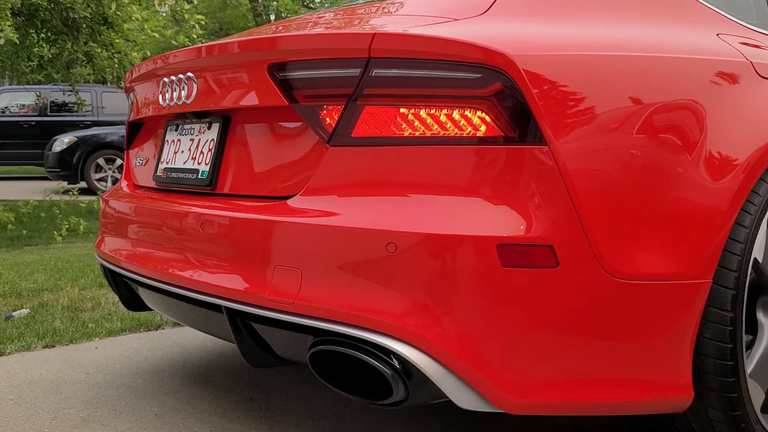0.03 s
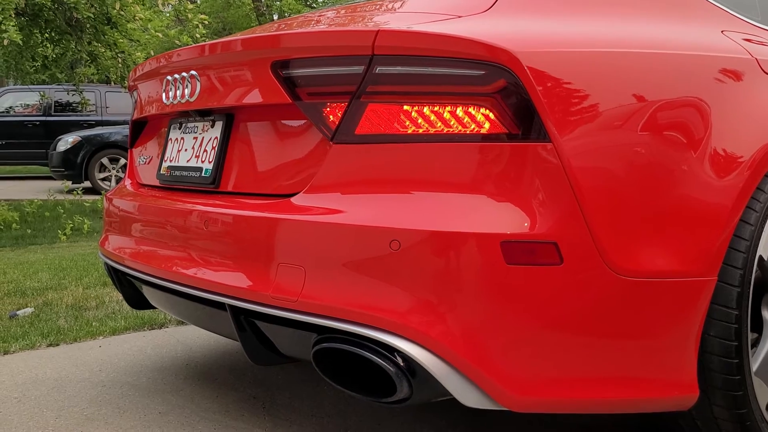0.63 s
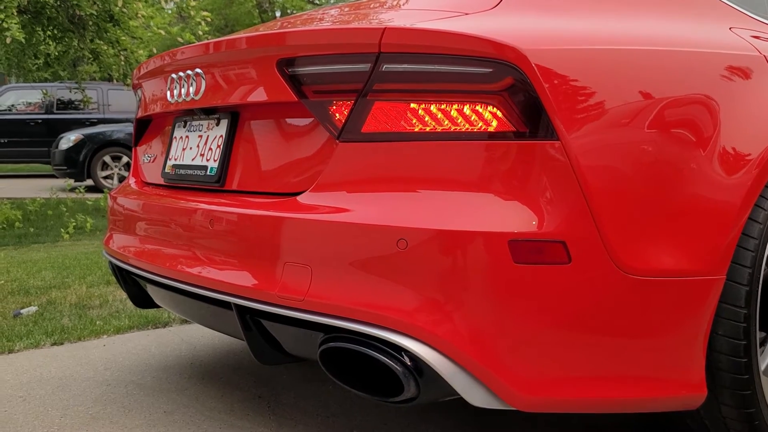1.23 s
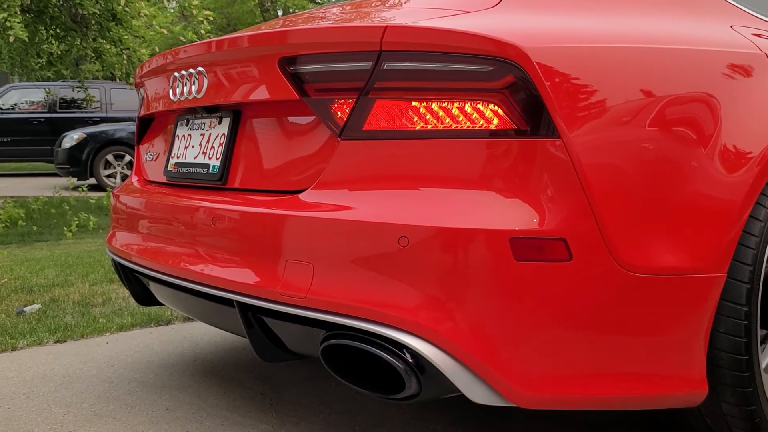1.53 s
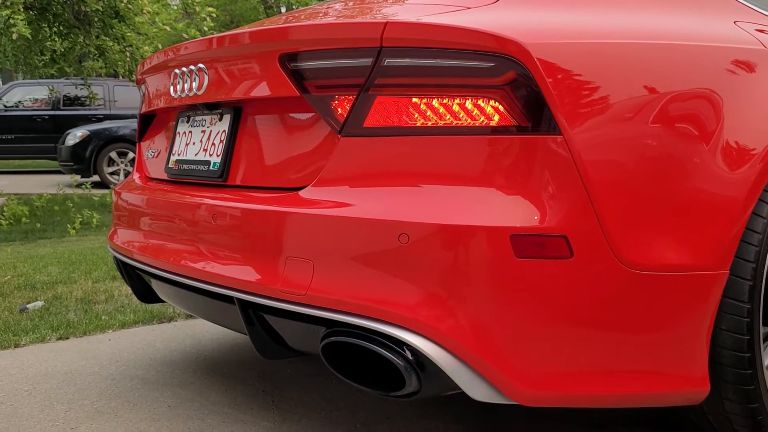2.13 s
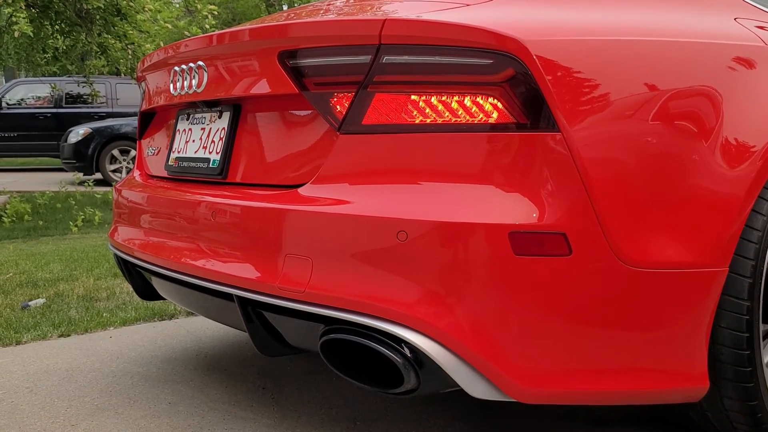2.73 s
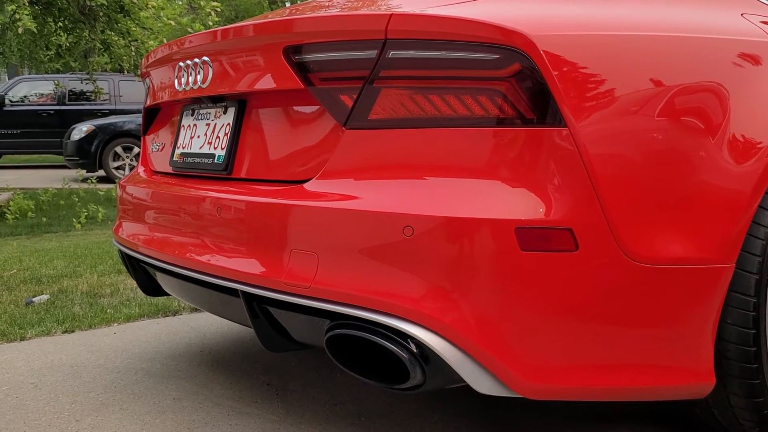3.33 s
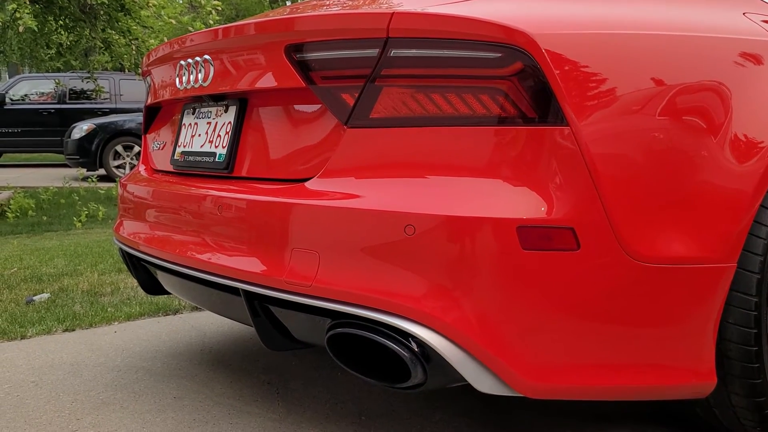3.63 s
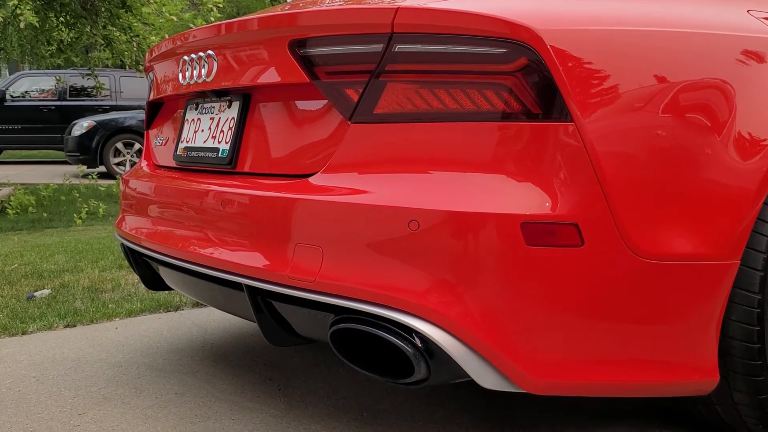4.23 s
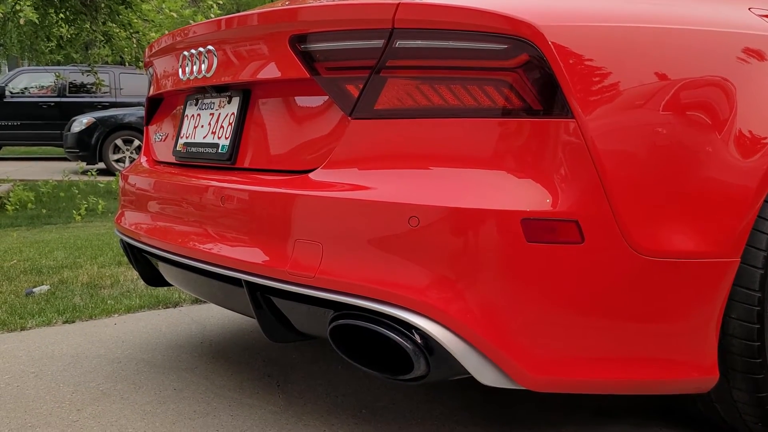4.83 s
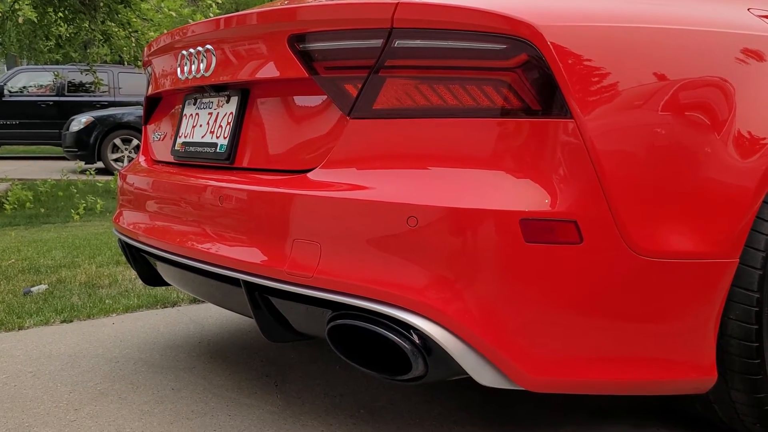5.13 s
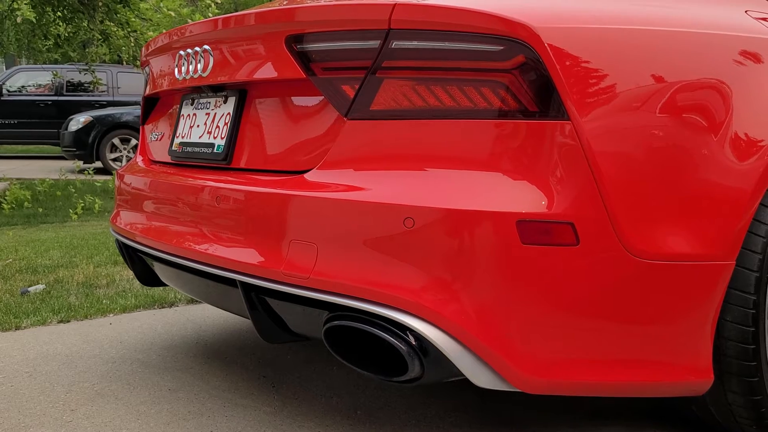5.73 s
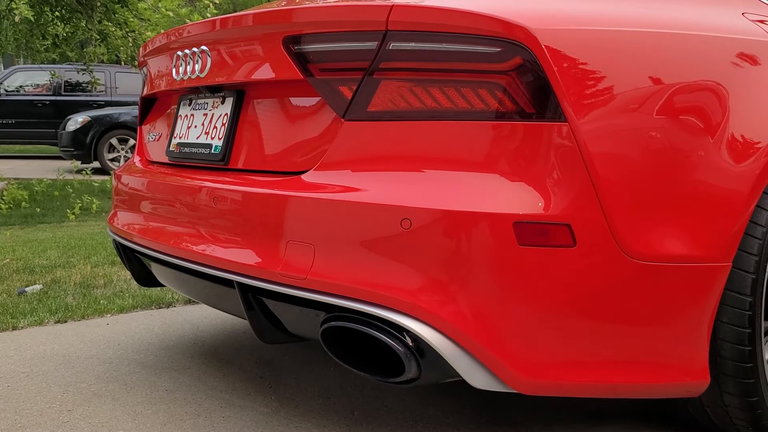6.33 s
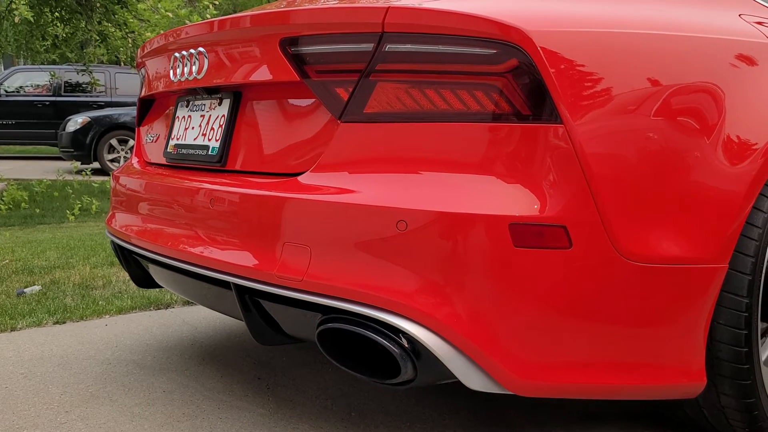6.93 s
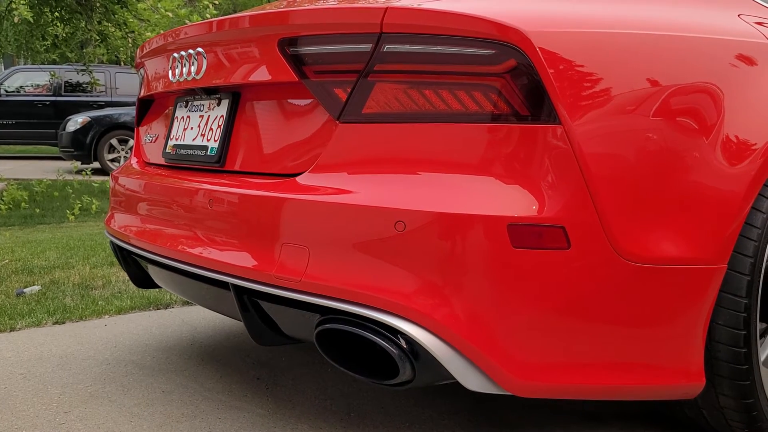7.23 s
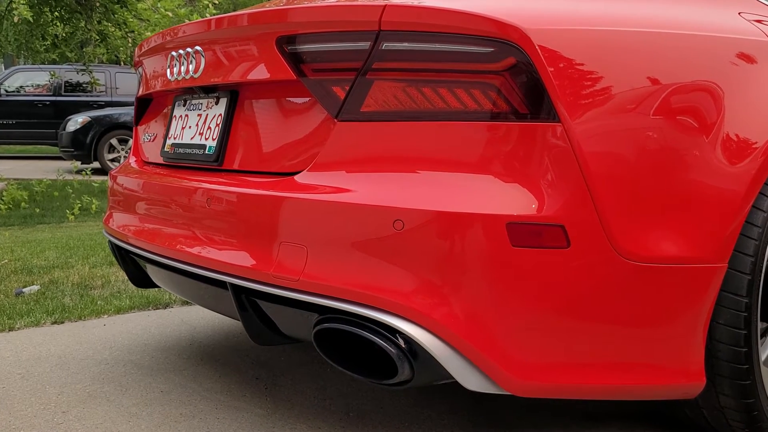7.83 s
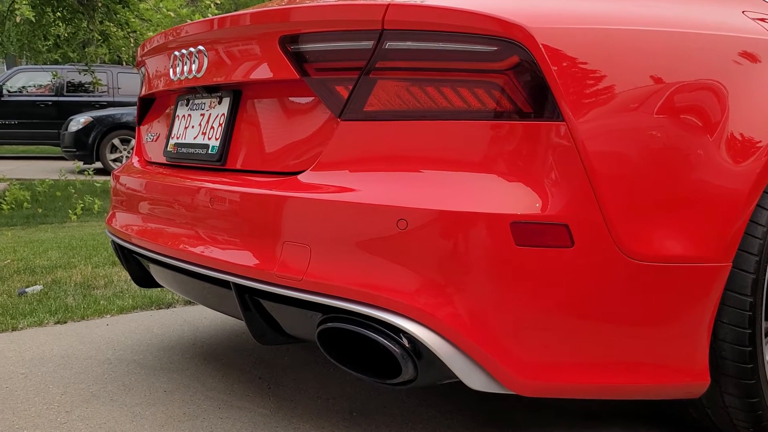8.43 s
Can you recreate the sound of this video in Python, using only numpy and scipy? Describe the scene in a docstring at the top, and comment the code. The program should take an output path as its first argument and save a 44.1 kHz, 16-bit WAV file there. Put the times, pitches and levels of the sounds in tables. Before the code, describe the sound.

Close to the tailpipe, a V8 car cold starts with a short grinding crank, a loud flare and a booming, raspy fast idle.

```python
"""A clunk and a grinding starter over faint outdoor air, then a cold V8 catches, flares and falls
to a fast idle. The car stands on a driveway, a stereo pair of microphones just behind its tailpipe.
The starter pinion slams into the ring gear and turns the engine over, each compression a thump.
Each firing sends a boom, a ringing pulse and a rasping burst of gas down the pipe;
the ground and the car's body reflect them."""
import sys
import numpy as np
from scipy import signal
from scipy.fft import rfft, irfft, next_fast_len
from scipy.io import wavfile

SR = 44100
rng = np.random.default_rng(int(sys.argv[2]) if len(sys.argv) > 2 else 0)


def wav_record(signal):
    """Record a signal, one row per channel, as 16-bit PCM in the file named by sys.argv[1]."""
    frames = np.transpose(np.atleast_2d(signal))
    bounded = np.clip(frames, -1, 1)
    # unit amplitude maps onto the largest positive 16-bit level
    quanta = np.round(bounded * 32767).astype(np.int16)
    wavfile.write(sys.argv[1], SR, quanta)


N = 374850
TIME = np.arange(N) / SR
STARTER_ON_S, FIRST_FIRING_S, STARTER_OFF_S = 1.225, 1.95, 1.97

# standing waves of the exhaust pipe (f/Hz, width/Hz, relative level/dB)
PIPE_MODES = [(435.2, 14, 6), (548.5, 36, -9), (678, 45, -6.5), (802.4, 44, 6.5), (902, 117, -3.),
              (1113, 77, -5.5)]
# resonances of its metal tip (f/Hz, width/Hz, relative level/dB)
TIP_MODES = [(1640, 52, -10.5), (1902, 12.5, -1), (2172, 148, -3), (2478, 65, 3.5), (2734, 9.2, -1.5),
             (2982, 80, -3.5), (3051, 96, -3), (3270, 12.7, -0.5)]
# spectrum of gas hissing out of the tip (f/Hz, relative level/dB)
HISS_SPECTRUM = [(500, -25), (1300, -8), (1650, 1), (3000, 1), (3700, -2.5), (4300, 2), (5000, -1.5),
                 (6300, -4), (7400, -4), (8800, -12), (12000, -12.5), (13500, -16), (16000, -19.5)]
# thumps of the compression strokes while cranking (t/s, level/dB)
STROKES = [(1.29, -36), (1.42, -21.5), (1.532, -17.5), (1.624, -26.5), (1.714, -32), (1.8, -43),
           (1.877, -27.5)]


def engine():
    """The V8 at the tailpipe, close up: boom, burble, ring and rasp follow one crankshaft."""
    # engine speed through catch, flare and fast idle (t/s, firing rate/Hz)
    speed = [(1.95, 45.56), (1.985, 39.41), (2.03, 63.0), (2.08, 84.24), (2.2, 108.88), (2.32, 117.62),
             (2.5, 107.35), (2.75, 100.82), (3.1, 85.28), (3.6, 87.16), (4.25, 93.03), (4.85, 89.66),
             (5.6, 88.94), (6.15, 87.3), (7.55, 87.64), (8.5, 86.28)]
    # effort against the settled idle (t/s, load/dB, gas flow/dB)
    effort = [(1.95, -5, -6.0), (2.0, 5.5, 5), (2.12, 12, 3.5), (2.38, 9, 0.5), (2.65, 1.5, -3),
              (2.88, 10, -1.5), (3.13, -4, -2.0), (3.6, 2, 0), (4.0, 6.0, 1.5), (4.3, 7.0, 0.0),
              (4.8, 3, -1), (5.6, 3.5, 0.0), (6.3, -0.5, 0), (8.5, -2, -1)]
    firing_hz, = in_time(speed)
    load_db, flow_db = in_time(effort)
    phase = np.cumsum(firing_hz) / SR   # counted in firings
    phase -= np.interp(FIRST_FIRING_S, TIME, phase)
    low = from_the_right(boom(phase, firing_hz, load_db) + burble(phase, flow_db, load_db))
    high = pipe_ring(phase, firing_hz, load_db) + rasp(phase, flow_db)
    return fade_in(1.925, 0.052) * low + fade_in(1.945, 0.013) * high + spits()


def boom(phase, firing_hz, load_db):
    """The muffler leaves a nearly pure firing tone; load brings out its overtones."""
    # loudness of the firing tone (t/s, relative level/dB)
    tone_levels = [(1.94, -24), (1.97, -14.5), (2.03, -5.5), (2.51, -17.5), (2.91, -12.5), (3.5, -10.5),
                   (4.84, -13), (5.84, -11), (8.36, -11.5), (8.4, -11.5)]
    # firings that fail (t/s, share lost/0-1, half width/s)
    misfires = [(2.072, 0.97, 0.0074), (2.501, 1, 0.0079)]
    # what the muffler lets through of the overtones (f/Hz, relative level/dB)
    muffler = [(80, 23), (125, 13.5), (150, -3.5), (180, 3), (205, -1), (235, 0), (280, -4), (330, -4),
               (400, -14), (470, -15)]
    tone = from_db(in_time(tone_levels)[0] - 0.27) * np.cos(2 * np.pi * phase)
    for at_s, lost, width_s in misfires:
        tone *= 1 - lost * np.exp(-((TIME - at_s) / width_s) ** 2)
    overtones = sum(gain_at(k * firing_hz, muffler) * np.cos(2 * np.pi * k * phase) for k in (2, 3, 4))
    return np.sqrt(2) * (tone + from_db(-40 + 1.54 * load_db) * overtones)


def burble(phase, flow_db, load_db):
    """Unequal cylinders add a lope every eight firings; the gas rushes harder under load."""
    # spectrum of the loping puffs (f/Hz, relative level/dB)
    lope_spectrum = [(20, -38), (40, 1), (65, -1), (115, 10), (138, 5.5), (160, -14.5), (215, -4.5),
                     (275, -14), (330, -7), (385, -19.5), (500, -23.5), (600, -15.5), (1200, -60),
                     (3000, -56)]
    # spectrum of the rushing gas (f/Hz, relative level/dB)
    rush_spectrum = [(20, -12), (60, 6.5), (120, 1), (170, -2.5), (280, 0), (380, -7), (520, -3),
                     (620, -15), (850, -3.5), (1050, -11), (1350, -16), (2000, -19), (5000, -45.5)]
    times, surplus, _ = firings(phase, lag=0.044)
    puffs = clicks(times, surplus + 0.27 * rng.standard_normal(len(times)))
    lope = from_db(-28 + flow_db) * unit_rms(coloured(puffs, lope_spectrum))
    rush = from_db(-33 + 0.49 * load_db) * noise(rush_spectrum)
    return reflected(lope + rush, wet_db=-6)


def pipe_ring(phase, firing_hz, load_db, unsteady_db=3.5, idle_hz=87.8):
    """Every puff strikes the standing waves of the pipe; faster puffs are more turbulent."""
    times, surplus, _ = firings(phase, lag=0.122)
    strengths = (1 + 0.78 * surplus) * from_db(unsteady_db * rng.standard_normal(len(times)))
    puffs = clicks(times, strengths)
    turbulence = 0.019 * (firing_hz / idle_hz) ** 4
    eddies = turbulence * bursts(puffs, decay_s=0.0065) * rng.standard_normal(N)
    ring = unit_rms(resonate(puffs + eddies, PIPE_MODES))
    return from_db(-42 + 0.63 * load_db) * reflected(ring, wet_db=-20)


def rasp(phase, flow_db, unsteady_db=3.5, steady_tip=0.43, steady_hiss=1.95):
    """Gas bursts out at each firing, a sharp front and then turbulence: it rings the tip and hisses."""
    times, _, cylinder_db = firings(phase, lag=0.12)
    fronts = clicks(times, from_db(cylinder_db + unsteady_db * rng.uniform(-1, 1, len(times))))
    gusts = bursts(fronts, decay_s=0.0036)
    tip = unit_rms(resonate(2 * fronts + (gusts + steady_tip) * rng.standard_normal(N), TIP_MODES))
    hiss = unit_rms(coloured((gusts + steady_hiss) * rng.standard_normal(N), HISS_SPECTRUM))
    return (from_db(-34.5 + 0.97 * flow_db) * reflected(tip, wet_db=-10)
            + from_db(-37 + 1.6 * flow_db) * reflected(hiss, wet_db=2))


def spits():
    """Now and then a puff of gas cracks harder in the tip and knocks in the pipe."""
    # harder spits of gas (t/s, relative crack level/dB, relative knock level/dB)
    hard_puffs = [(1.9629, -20, -41), (1.9884, -14.5, -39), (2.0767, -12, -30), (2.1106, -13.5, -26),
                  (3.0046, -19, -31.5), (3.3762, -18, -40), (4.2924, -31, -25.5), (4.6533, -22, -31),
                  (5.0983, -15.5, -35), (6.0327, -19, -45), (6.7645, -20, -36), (7.8974, -28, -38),
                  (8.324, -17, -36)]
    times, crack_db, knock_db = np.transpose(hard_puffs)
    fronts = clicks(times, from_db(crack_db))
    gas = 7.4 * fronts + bursts(fronts, decay_s=0.002) * rng.standard_normal(N)
    crack = from_db(13) * resonate(gas, TIP_MODES) + from_db(-14) * coloured(gas, HISS_SPECTRUM)
    knock = resonate(clicks(times, from_db(knock_db + 42)), PIPE_MODES)
    return reflected(crack + knock, wet_db=-9)


def firings(phase, lag):
    """Time, surplus and rasp of each puff, leaving the pipe `lag` of a cycle after its firing."""
    # the eight cylinders in firing order (surplus of the puff/-1..1, relative rasp level/dB)
    cylinders = [(0.61, 2.5), (0.15, 1), (0.72, -2), (-0.47, 0), (1, 3.5), (0.19, 3.7), (-0.22, -1.5),
                 (0.27, 7.6)]
    number = np.arange(int(phase[-1]))
    surplus, rasp_db = np.array(cylinders)[number % len(cylinders)].T
    return np.interp(number + lag, phase, TIME), surplus, rasp_db


def pinion():
    """The starter pinion slams into the ring gear, chatters and rings the bell housing."""
    # blows of the pinion (t/s, relative level/dB, decay/s)
    blows = [(1.263, -38, 0.014), (1.276, -38, 0.013), (1.286, -52, 0.0099)]
    # spectrum of the clunk (f/Hz, relative level/dB)
    clunk_spectrum = [(76, -34), (130, -6), (318, -10), (650, -18), (911, -11), (1560, -20), (2270, -12.5),
                      (3590, -29), (7480, -20), (15000, -47)]
    # resonances of the bell housing (f/Hz, width/Hz, relative level/dB)
    housing_modes = [(166, 49, -2), (246, 18, 1), (325, 13, 2), (485, 19, -37)]
    envelope = sum(bursts(clicks([at_s], [from_db(db)]), decay_s) for at_s, db, decay_s in blows)
    chatter = envelope * rng.standard_normal(N)
    clunk = from_db(22.5) * coloured(chatter, clunk_spectrum)
    housing = from_db(25) * resonate(chatter, housing_modes)
    return reflected(clunk + housing + from_db(-5.5) * chatter, wet_db=0)


def starter(whine_hz=297.3, spin_up_s=0.4):
    """The starter grinds and whirrs, swelling with each stroke, until the engine has caught."""
    # spectrum of the grinding gears (f/Hz, relative level/dB)
    gear_spectrum = [(90, -1.5), (150, -6), (300, -8), (400, -9.5), (530, -5), (640, -13.5), (850, -2.5),
                     (1100, -14), (1500, -24), (2300, -20.5), (3500, -26.5), (8000, -46)]
    # spectrum of the motor's whirr (f/Hz, relative level/dB)
    whirr_spectrum = [(1000, -5), (2500, 3), (3600, -6), (4600, -1.5), (5800, -6), (7300, 0), (9000, -17),
                      (12000, -9.5), (16000, -32)]
    # the motor sings lower as it takes the load (t/s, f/Hz, level/dB)
    sag = [(1.36, 549, -67), (1.41, 551, -40), (1.46, 526, -44), (1.53, 464, -70)]
    swell = stroke_swell()
    running_s = np.clip(TIME, STARTER_ON_S, STARTER_OFF_S) - STARTER_ON_S
    grind = fade_in(1.26, 0.02) * noise(gear_spectrum)
    whine = from_db(-2.5) * unit_rms(resonate(rng.standard_normal(N), [(whine_hz, 10, 0)]))
    gears = from_db(-42.5 + 3 * swell - 3 * running_s) * fade_in(STARTER_ON_S, 0.014) * (grind + whine)
    song_hz, song_db = in_time(sag)
    song = from_db(song_db) * np.sin(2 * np.pi * np.cumsum(song_hz) / SR)
    whirr_db = -56 + 3 * swell * fade_in(STARTER_ON_S, spin_up_s) + 6 * running_s
    whirr = from_db(whirr_db) * noise(whirr_spectrum)
    motor = gears + fade_in(1.28, 0.061) * (song + whirr)
    release = 1 - fade_in(STARTER_OFF_S, 0.057)
    return reflected(release * motor, wet_db=-1.5)


def stroke_swell(lag=0.18):
    """One swell (-1..1) per compression stroke, peaking `lag` of a stroke after its thump."""
    times = [at_s for at_s, _ in STROKES] + [STARTER_OFF_S]
    stroke_phase = np.interp(TIME, times, np.arange(len(times)))
    return np.cos(2 * np.pi * (stroke_phase - lag))


def compression_thumps(muffler_hz=57.9, decay_s=0.1):
    """While the engine is cranked, each compression stroke thumps the muffler."""
    thumps = np.zeros(N)
    for at_s, db in STROKES:
        age_s = np.maximum(TIME - at_s, 0)
        thumps -= from_db(db) * np.exp(-age_s / decay_s) * np.sin(2 * np.pi * muffler_hz * age_s)
    return from_the_right(thumps)


def outdoors(swell_db_per_s=6.5):
    """Faint air and far traffic around the driveway, swelling until the starter engages."""
    # spectrum of the outdoor murmur (f/Hz, relative level/dB)
    air_spectrum = [(15, -22), (25, -5), (59, -1.5), (112, 1), (172, -11), (278, -2.5), (438, -16),
                    (543, -12), (1210, -15), (3180, -44.5), (7280, -41), (8550, -48), (15000, -47)]
    air_db = -65.5 + swell_db_per_s * np.minimum(TIME, STARTER_ON_S)
    return from_db(air_db) * fade_in(0.034, 0.0028) * reflected(noise(air_spectrum), wet_db=1)


def reflected(x, wet_db, lowest_hz=580):
    """Nearby surfaces throw the short waves back from the sides, setting the two microphones apart."""
    # sideways paths by ground, bumper and wheel (delay/s, relative level/dB)
    echoes = [(.0009, -30), (.0023, -19.5), (.0043, -6.5), (.0079, 0), (0.0125, -13.5), (0.0239, -16.5)]
    treble = signal.sosfilt(signal.butter(2, lowest_hz, "high", fs=SR, output="sos"), x)
    side = sum(from_db(db) * np.interp(TIME - delay_s, TIME, treble, left=0) for delay_s, db in echoes)
    return x + from_db(wet_db) * side * [[1], [-1]]


def from_the_right(x, lag_samples=18):
    """The bass reaches the left microphone slightly late."""
    left, right = np.broadcast_to(x, (2, N))
    return np.array([np.pad(left, (lag_samples, 0))[:N], right])


def from_db(db):
    """Decibels to gain."""
    return 10 ** (np.asarray(db) / 20)


def unit_rms(x):
    """Scale to unit power."""
    return x / np.sqrt(np.mean(x ** 2) + 1e-20)


def in_time(rows):
    """Each column of a curve table at every sample."""
    times, *columns = np.transpose(rows)
    return [np.interp(TIME, times, column) for column in columns]


def fade_in(start_s, length_s):
    """A ramp from 0 to 1."""
    return np.clip((TIME - start_s) / length_s, 0, 1)


def gain_at(at_hz, spectrum):
    """Gain of a spectrum, read along a logarithmic frequency axis."""
    hz, db = np.transpose(spectrum)
    return from_db(np.interp(np.log(at_hz), np.log(hz), db))


def coloured(x, spectrum):
    """Causal (minimum-phase) filter with the given spectrum."""
    size = next_fast_len(N + SR // 4, real=True)
    size += size % 2
    grid_hz = np.maximum(np.fft.rfftfreq(size, 1 / SR), 1)
    cepstrum = irfft(np.log(gain_at(grid_hz, spectrum)))
    cepstrum[1:size // 2] *= 2
    cepstrum[size // 2 + 1:] = 0
    return irfft(rfft(x, size) * np.exp(rfft(cepstrum)))[..., :N]


def noise(spectrum):
    """Coloured noise of unit power."""
    return unit_rms(coloured(rng.standard_normal(N), spectrum))


def resonate(x, modes):
    """Parallel resonances with alternating signs."""
    ringing = 0
    for k, (hz, width_hz, db) in enumerate(modes):
        radius = np.exp(-np.pi * width_hz / SR)
        poles = [1, -2 * radius * np.cos(2 * np.pi * hz / SR), radius ** 2]
        gain = (-1) ** k * from_db(db) * (1 - radius ** 2) / 2
        ringing = ringing + gain * signal.lfilter([1, 0, -1], poles, x + 1e-18)
    return ringing


def clicks(times, sizes):
    """One impulse at each time."""
    samples = np.round(np.asarray(times) * SR).astype(int)
    return np.bincount(np.clip(samples, 0, N - 1), sizes, N)


def bursts(hits, decay_s):
    """Each impulse starts an envelope that dies away."""
    return signal.lfilter([1], [1, -np.exp(-1 / (decay_s * SR))], hits + 1e-18)


def scene():
    """The cold start and the open air, from just behind the tailpipe."""
    return pinion() + starter() + compression_thumps() + engine() + outdoors()


def record(dry, ceiling=1.48, cutoff_hz=15600):
    """Each microphone has its own colour; peaks are rounded and the top is cut."""
    # balance of the microphone pair (f/Hz, left minus right level/dB)
    balance = [(90, -0.1), (300, -1.5), (520, -1), (1000, 3), (1900, -2), (2500, -2.5), (3100, -7),
               (3800, -1.5), (7000, -1), (11000, 2.5), (15000, 8)]
    left = coloured(dry[0], [(hz, db / 2) for hz, db in balance])
    right = coloured(dry[1], [(hz, -db / 2) for hz, db in balance])
    rounded = ceiling * np.tanh(np.array([left, right]) / ceiling)
    return signal.sosfilt(signal.ellip(10, 0.1, 80, cutoff_hz, fs=SR, output="sos"), rounded)


dry = scene()
out = record(dry)
wav_record(out)
```